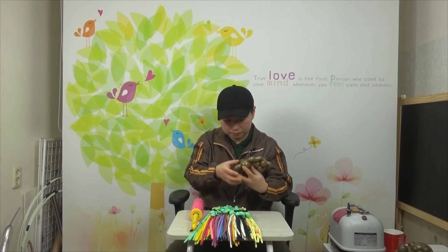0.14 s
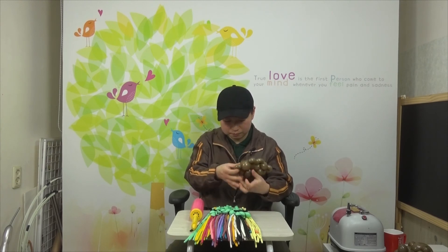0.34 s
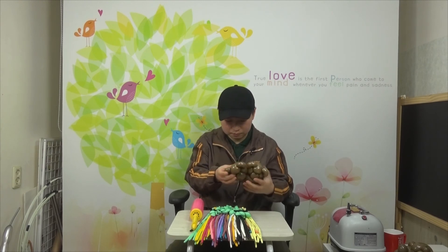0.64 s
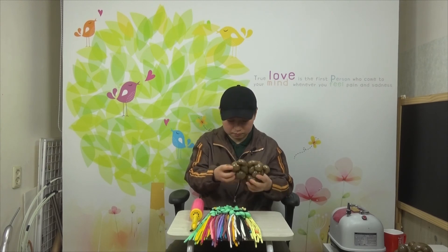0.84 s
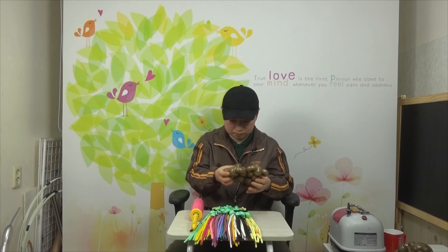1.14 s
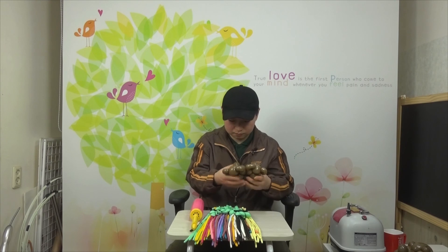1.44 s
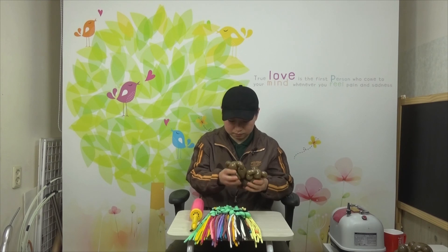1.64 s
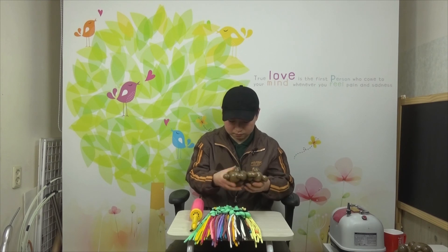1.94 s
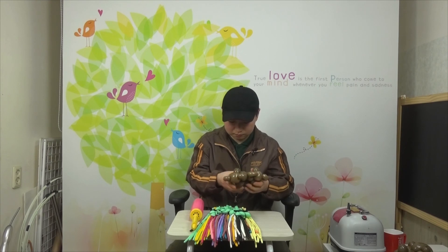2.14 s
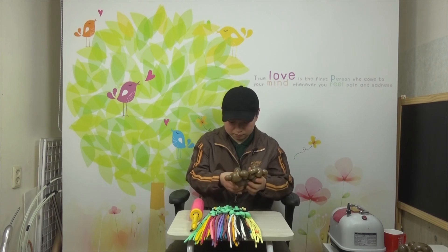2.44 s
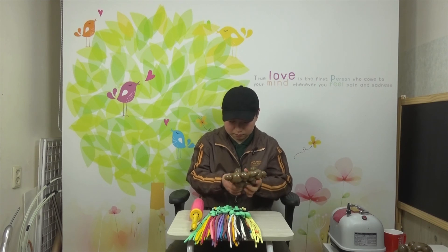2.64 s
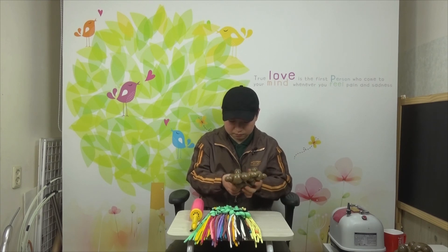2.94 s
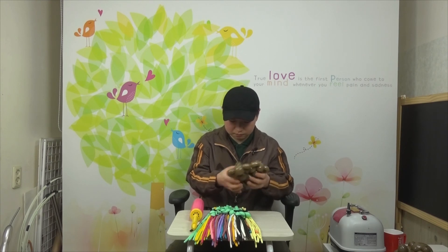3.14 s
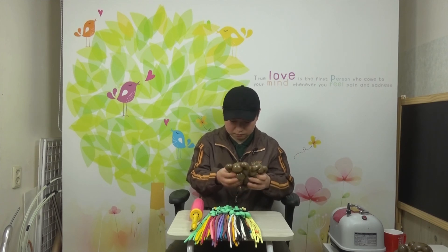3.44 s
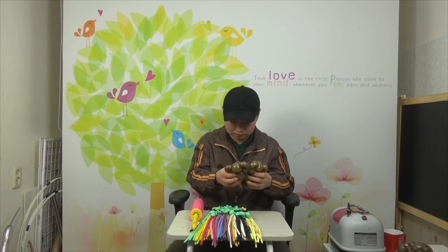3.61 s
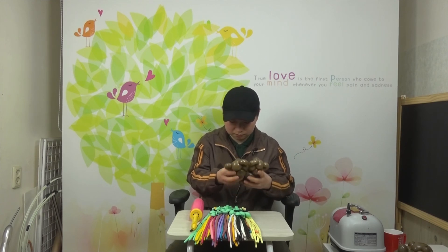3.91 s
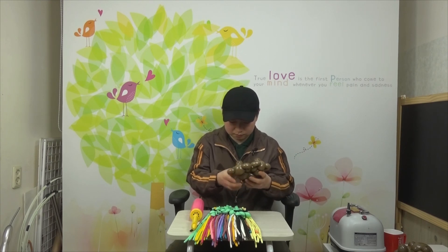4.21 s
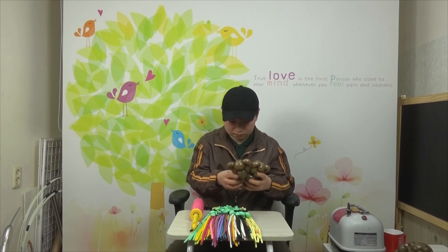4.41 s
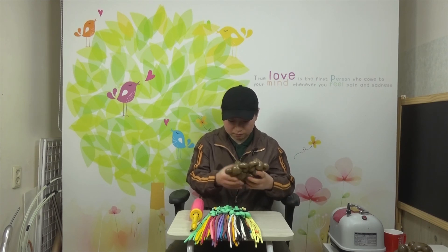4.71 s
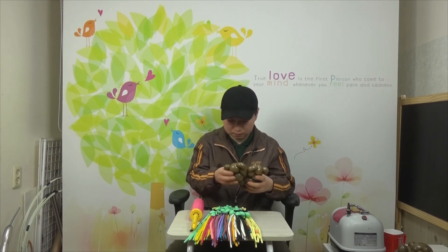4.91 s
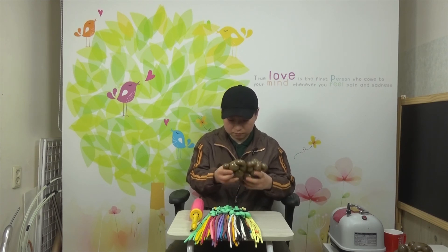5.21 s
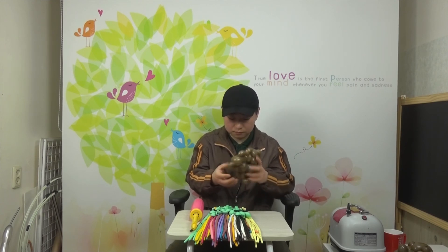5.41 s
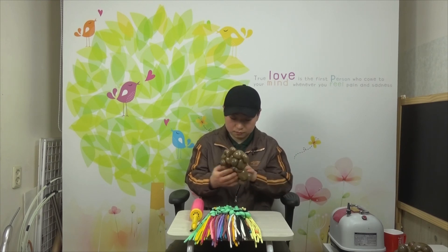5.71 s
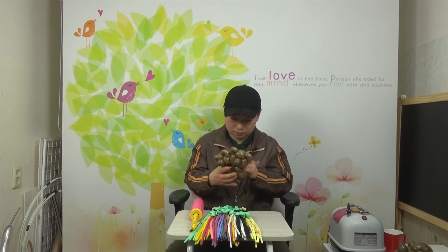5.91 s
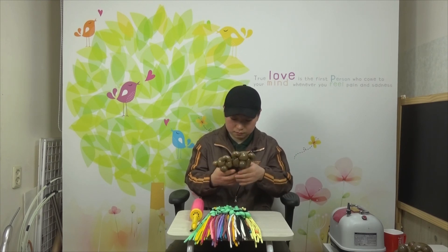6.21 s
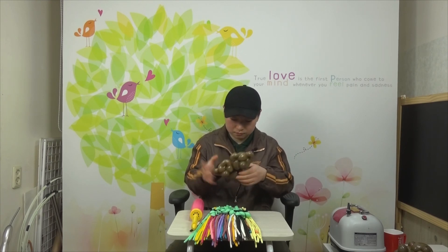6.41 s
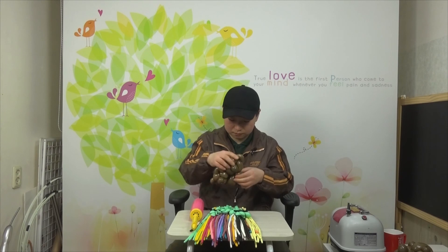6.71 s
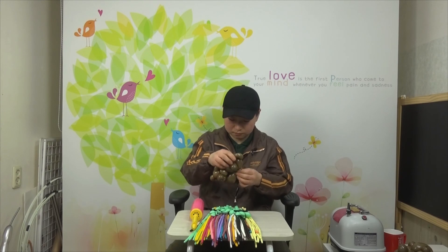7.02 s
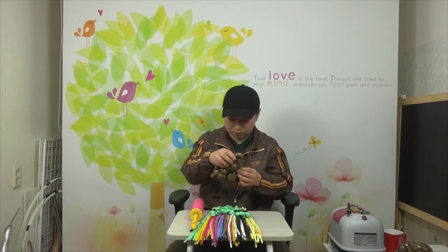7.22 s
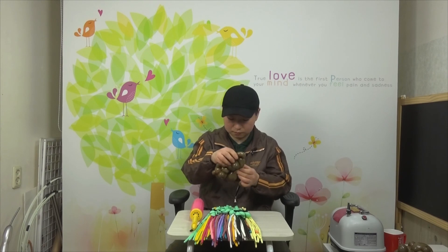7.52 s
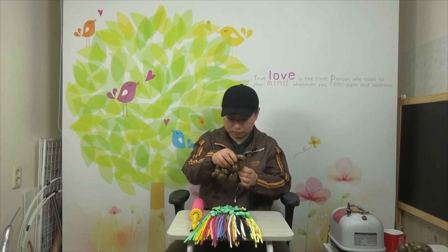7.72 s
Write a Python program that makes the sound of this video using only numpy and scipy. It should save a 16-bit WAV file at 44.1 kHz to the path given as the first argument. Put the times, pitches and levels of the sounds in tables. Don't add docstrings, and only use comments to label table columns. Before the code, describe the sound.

Close to the microphone, hands handle a figure of twisted balloons in a small quiet room. Faint sliding gives way to uneven rubbery rubs, dry snaps and hollow booms of the air-filled segments. A stuttering creak comes near the middle, then low groaning strokes, and finally a thick burst of snaps, peeling ticks and thumps. Soft sleeve rustle and a short dull reverberation lie underneath.

```python
import sys
import numpy as np
from scipy import signal
from scipy.fft import rfft, irfft, next_fast_len
from scipy.io import wavfile

SR = 44100
rng = np.random.default_rng(int(sys.argv[2]) if len(sys.argv) > 2 else 0)


def invert_db(level):
    return 10 ** (np.asarray(level, dtype=float) / 20)


def to_wav(sig):
    pcm = np.clip(np.atleast_2d(sig), -1, 1) * 32767
    pcm = np.round(pcm).astype(np.int16)
    wavfile.write(sys.argv[1], SR, pcm.T)


N = 346251

# [f/Hz, density level/dB]
AIR_SPECTRUM = [(25, -25), (110, -24), (480, -5), (1500, -10), (6000, -17), (16000, -30)]
AIR_DB = -58
SLEEVES_FROM_S, SLEEVES_DB = 0.31, 5.5
SLEEVE_RUMBLE_DB, SLEEVE_TOP_HZ = -51.5, 137

# [t/s, length/s, sliding level/dB, squeeze level/dB]
RESTS = [(0, 0.032, -51, 10.5), (0.22, 0.14, -58, 15), (0.69, 0.083, -48, 10), (1.236, 0.15, -42.5, 6.5),
         (1.438, 0.2, -43, 1), (1.722, 0.023, -43, 17.5), (2.317, 0.15, -39, -1), (2.96, 0.05, -38.5, 7.5),
         (3.184, 0.084, -38, 2), (3.56, 0.18, -46.5, 5.5), (3.943, 0.033, -42.5, 7),
         (4.338, 0.03, -56.5, 17), (4.555, 0.24, -42, -2), (4.787, 0.1, -57, 9.5), (5.13, 0.09, -44.5, 4),
         (5.397, 0.21, -46, -1), (5.6, 0.11, -52, 2), (6.152, 0.064, -41, -1.5), (6.509, 0.11, -45, 5.5),
         (6.657, 0.074, -49, 21), (6.914, 0.058, -37, -3), (7.333, .05, -36.5, -10),
         (7.461, 0.19, -41.5, 0)]
# [t/s, length/s, sliding level/dB, squeeze level/dB]
RUBS = [(0.477, 0.2, -36.5, 6), (0.862, .3, -30.5, -0.5), (0.961, 0.064, -21.5, -8.5),
        (1.57, 0.15, -26.5, -5), (1.782, 0.069, -38.5, 12), (1.866, 0.11, -26.5, -0.5),
        (2.472, 0.11, -29.5, -4), (2.594, 0.2, -35.5, 0.5), (2.816, 0.14, -29, -6), (3.03, 0.15, -29, -4),
        (3.292, 0.13, -34.5, 4), (3.417, 0.13, -27, -2.5), (3.684, 0.068, -29.5, -1.5),
        (3.978, 0.069, -28, -1.5), (4.425, 0.12, -27, -3), (4.681, 0.07, -31.5, 5),
        (4.912, 0.19, -22.5, -2.5), (5.238, 0.12, -23.5, 2.5), (5.761, 0.099, -35.5, 0),
        (5.885, 0.11, -34.5, 10.5), (6.026, 0.1, -33, -4), (6.328, 0.13, -31, 2), (6.45, 0.052, -41, 19.5),
        (6.742, 0.14, -27.5, 1.5), (6.964, 0.12, -25.5, -1), (7.112, 0.21, -35, 5),
        (7.385, 0.062, -24.5, 1), (7.61, 0.09, -24, -2.5), (7.714, 0.09, -33, -6), (7.818, .04, -28.5, 3)]
# [t/s, sliding level/dB, squeeze level/dB]
JERKS = [(0.368, -37.5, 17), (.4, -35, 13.5), (0.803, -32, 6.5), (1.181, -25, 3), (1.21, -42.5, 18),
         (2.143, -44, 9.5), (2.281, -35.5, 3.5), (2.404, -34, 5.5), (2.523, -20, -5), (3.1, -30, -3),
         (3.867, -40, 10.5), (3.9, -32, -8), (4.202, -33, -3.5), (4.238, -29, 10), (4.403, -40, 7),
         (4.602, -27, -8), (5.212, -31, 6), (5.695, -31, 3), (5.72, -32.5, 5.5), (6.267, -37, 8),
         (6.296, -39.5, 4), (7.102, -21, -7.5)]
JERK_S = 0.024
STILL_DB, LETTING_GO_DB_PER_S = -105, 386
# [start t/s, end t/s]
GLIDES = [(0, 0.057), (.52, 0.63), (1.575, 1.44), (1.872, 1.9), (2.33, 2.31), (2.48, 2.58), (3.105, 3.28),
          (4.429, 4.27), (4.91, 5.03), (5.8, 5.83), (5.91, 6.4), (6.02, 6.25)]
GLIDE_HZ, GLIDE_DB = 6100, -29
SLIPS_PER_S = 260
CREAK_SHARE, CREAK_DB = 0.36, -1.5
RUMBLE_BELOW_DRUM_DB = -18

# [f/Hz, density level/dB]
SKIN_SPECTRUM = [(710, -33), (1200, -4), (2360, -2), (3500, -7.5), (5200, 1.5), (6940, -2.5), (14500, -13),
                 (15500, -8.5)]
# [f/Hz, level/dB, t60/s]
DRUM_MODES = [(203, -7.5, 0.032), (300, -4.5, 0.019), (500, 0.17, 0.02), (694, -1, 0.014),
              (937, -1.5, 0.01)]
# [f/Hz, level/dB, t60/s]
JOINT_MODES = [(2230, 0.5, 0.013), (2950, 1.5, 0.0064), (4080, 4.5, 0.003), (7510, -6.5, 0.0087),
               (10800, -25, 0.0023)]
# [f/Hz, level/dB, t60/s]
CREAK_BODY = [(382, 2.0, 0.022), (850, 2.3, 0.02), (1160, -2.0, 0.012)]
CHIRP_BODY = [(570, -3.0, 0.01), (1160, 4.0, 0.0056), (1550, -2, 0.0098)]
GROAN_BODY = [(180, -2.5, 0.014), (470, -4.0, 0.035), (800, -2.0, 0.0098)]

ROOM_T60_S, ROOM_DB, WALL_CUT_HZ = 0.29, -23, 5500

# [t/s, peak level/dB]
KNOT_SNAPS = [(.204, -29), (.37, -22), (1.4438, -24), (1.8291, -26), (2.7174, -14), (3.0448, -25),
              (3.6898, -29), (3.919, -14), (5.179, -15.5), (5.4671, -21), (5.9802, -32), (6.379, -8.5),
              (6.4408, -6.5), (6.4884, -9.5), (7.041, -7.5), (7.2138, -28), (7.3002, -10.5), (4.363, -32),
              (7.3808, -14), (7.5516, -17)]
# [t/s, peak level/dB]
SLACK_SNAPS = [(1.8005, -14), (.2948, -29), (.7371, -20.5), (.8067, -16), (.998, 4), (1.151, -11),
               (1.3736, -13), (1.786, -6.5), (1.9354, -0.5), (2.8082, -6.5), (2.8296, -8), (2.857, -12),
               (3.0987, -9.5), (3.168, -5), (3.2031, -14.5), (3.2364, -1.5), (2.2194, -29), (4.405, -17),
               (3.6204, -18), (3.7445, -12.5), (3.8779, -10.5), (3.8902, -6.5), (4.2411, -9.5),
               (5.6988, -4.5), (5.727, -19), (5.7912, -9.5), (6.4131, -12), (6.8616, 2), (7.4165, 0),
               (7.8206, -5)]
# [t/s, peak level/dB]
FLANK_SNAPS = [(.3077, -26), (.322, -26), (.4706, -10.5), (1.0826, -13), (1.3259, -12), (1.5004, -22.5),
               (1.8138, -11), (1.87, -5), (2.158, -12), (2.5518, 1), (2.6327, -6), (2.6672, -6),
               (2.703, -15), (2.74, -15), (2.7738, -13), (2.89, -9.5), (2.9382, -2.5), (3.5944, -15.5),
               (3.9272, -7), (3.9794, -8), (4.016, -9.5), (4.2044, -25), (4.605, -15.5), (4.685, -19),
               (6.214, -26), (6.3247, -13), (6.662, -14.5), (6.914, -10.5), (7.58, -16), (7.6433, -5.5)]
# [t/s, peak level/dB]
TIGHT_SNAPS = [(.2591, -25), (.8706, -8.5), (1.6292, -12), (1.939, -4.5), (5.9914, -34), (6.5698, -28),
               (6.7543, -16), (7.0606, -8), (7.0816, -4), (7.1124, 0), (7.1414, -6.5), (7.199, -8.5),
               (7.266, -2.5), (7.312, -9)]
# [t/s, peak level/dB]
PEELS = [(.482, -9.5), (1.7246, -13), (2.0026, -12), (2.0228, -10), (2.9268, -16), (2.9672, -10),
         (3.782, -20), (4.2578, -7), (4.7457, -13), (5.4896, -25), (7.0225, -5), (7.106, 3.5), (7.705, -9),
         (7.798, -9), (7.8408, -5.5)]
KNOT_HZ, SLACK_HZ, FLANK_HZ, TIGHT_HZ, PEEL_HZ = 1890, 2650, 4350, 5970, 8640
PITCH_SCATTER = 0.072
# [t/s, peak level/dB, skin pitch f/Hz]
TICKS = [(0.286, -27, 2340), (0.3906, -23, 3990), (0.4045, -18, 2650), (0.4114, -15, 3320),
         (0.5126, -17.5, 2380), (0.5487, -15, 2430), (0.6025, -25, 2430), (0.653, -17, 3300),
         (0.7636, -24, 2430), (0.831, -23, 2400), (0.9295, -12, 2900), (0.9562, -13, 2900),
         (1.1034, -10.5, 2760), (1.128, -11, 4340), (1.3052, -18.5, 5550), (1.47, -21.5, 2360),
         (1.5554, -23, 7600), (1.5722, -18, 2800), (1.6138, -14, 5490), (1.674, -11.5, 2540),
         (1.7324, -17.5, 2510), (1.8337, -11.5, 2570), (1.942, -9, 2300), (1.9534, -14, 2510),
         (1.963, -22, 3100), (1.9714, -17, 2320), (1.9838, -20, 2650), (2.384, -24, 2520),
         (2.4505, -25, 4080), (2.4627, -27, 2340), (2.4755, -19, 4120), (2.5375, -10, 3930),
         (2.5735, -8, 4200), (2.6544, -13, 2670), (2.684, -19, 4270), (3.007, -29, 7700),
         (3.0613, -19, 2450), (3.4102, -9, 2500), (3.4507, -21, 2480), (3.4893, -17, 2700),
         (3.5242, -11, 2620), (4.212, -14, 4130), (4.2342, -17, 2640), (4.3415, -28, 2640)]
# [t/s, peak level/dB, skin pitch f/Hz]
LATER_TICKS = [(4.4263, -19, 2890), (4.4795, -9, 8300), (4.4941, -11.5, 2570), (4.509, -10, 2500),
               (4.5441, -12, 4030), (4.56, -19, 7700), (4.6224, -15, 1460), (4.6326, -16, 4020),
               (4.6723, -15, 1500), (4.6974, -22, 2310), (4.707, -23, 7160), (4.7278, -12, 1490),
               (4.9714, -21, 2850), (5.033, -13, 1690), (5.3365, -11, 2420), (5.3586, -19, 2330),
               (5.3894, -17, 2430), (5.5952, -24.5, 1720), (5.7134, -10, 1560), (5.737, -22, 2370),
               (5.895, -7.5, 1900), (5.9042, -9.5, 6100), (5.9519, -22, 2230), (5.9624, -17, 2470),
               (6.2645, -18, 2050), (6.2722, -20, 5290), (6.2866, -15, 2070), (6.3569, -10.5, 1550),
               (6.4126, -5, 1500), (6.429, -11, 1540), (6.449, -12, 1690), (6.5144, -18, 1490),
               (6.7237, -19, 1520), (6.784, -11.5, 2170), (6.9531, -21, 2400), (6.983, -21, 7360),
               (7.001, -12, 6940), (7.1225, -6.5, 5130), (7.222, -23, 2890), (7.2314, -30, 2970),
               (7.2455, -12.5, 5360), (7.3255, -14, 8200), (7.3622, -19, 1720), (7.434, -13, 8630),
               (7.445, -15, 1680), (7.462, -20, 1790), (7.4844, -22, 4130), (7.609, -17, 2380),
               (7.6832, -9.5, 3400), (7.7472, -21, 4260)]

# [t/s, peak level/dB, f/Hz, t60/s]
BOOMS = [(0.205, -10.5, 800, 0.02), (.37, 0.5, 954, 0.025), (.408, -10, 530, 0.02),
         (0.654, -9.5, 470, 0.058), (1.182, -11, 676, 0.24), (1.546, -15.5, 480, 0.012),
         (1.782, -21, 750, 0.046), (1.821, -2.5, 795, 0.019), (1.934, -4, 718, .081),
         (2.153, -18, 860, 0.032), (2.322, -12, 595, 0.016), (2.416, -14, 506, 0.063),
         (2.524, -12, 590, 0.029), (2.806, -14.5, 930, .022), (3.233, -10, 650, 0.021),
         (7.818, -13, 487, 0.028), (4.241, -10.5, 974, 0.021), (4.402, -12, 525, 0.037),
         (4.694, -7.5, 432, 0.021), (5.177, -15, 530, 0.019), (5.431, -9, 513, 0.025),
         (5.697, -10.5, 575, 0.035), (5.893, -6.5, 446, 0.041), (6.263, -13, 447, 0.008),
         (6.361, -7, 499, 0.061), (6.423, -7, 305.8, 0.068), (6.44, -0.5, 466, 0.028),
         (6.661, -12, 976.6, 0.024), (6.786, -8, 463, 0.023), (6.861, 4.5, 308, 0.016),
         (.205, -9, 1920, .018),
    (.205, -33, 3760, .03),
    (0.206, -26, 2720, .02),
    (0.371, -18, 1760, 0.033),
    (.37, -28, 3260, .025),
    (.519, -10, 104, .2),
    (1.829, -7, 805, 0.021),
    (5.388, -14, 445, 0.017),
    (6.452, -1.5, 470, 0.043),
    (4.75, -10, 470, 0.013),
]
# [t/s, peak level/dB, f/Hz]
THUMPS = [(0.381, -16.5, 102), (.415, -9, 130), (0.615, -9.5, 91), (.655, -11, 90), (.806, -16.5, 94),
          (1.181, -18.5, 146), (2.339, -19, 66.4), (3.9, -21, 46.3), (3.969, -14.5, 98), (4.412, -18, 83),
          (4.687, -17.5, 92), (5.129, -16, 157), (5.435, -19, 108), (5.596, -23.5, 82), (5.7, -14, 97.5),
          (5.886, -18.5, 102), (5.956, -5.5, 52), (5.99, -11, 60), (6.062, -21, 33.3), (6.276, -17, 82),
          (6.379, -9, 131), (6.445, -2, 91), (6.475, -8, 122), (6.734, -15, 30.3), (6.791, -14, 70),
          (6.861, -11, 122), (7.116, -22, 94.5),
          (0.995, -21, 94),
    (1.41, -26, 60),
    (1.468, -22, 173),
    (1.552, -24, 54),
    (2.179, -28, 79),
    (6.151, -22.5, 153),
    (7.458, -21, 67),
]
PARTNER_RATIO = 1.75

# [start t/s, end t/s, start f/Hz, end f/Hz, level/dB]
SINGING = [(0.525, 0.583, 5600, 5800, -41), (1.872, 1.928, 4200, 3500, -27),
           (1.872, 1.918, 7600, 6600, -30), (1.872, 1.92, 12600, 13400, -33), (2.5, 2.527, 8000, 6800, -45),
           (3.105, 3.165, 2600, 2500, -33), (3.105, 3.165, 4100, 4000, -34), (3.085, 3.16, 8000, 7800, -36),
           (4.434, 4.48, 4300, 4100, -32), (4.57, 4.607, 2900, 2900, -42), (4.707, 4.726, 8500, 8500, -30),
           (4.915, 5.001, 2950, 2700, -52), (4.922, 5.002, 1050, 1500, -37), (5.057, 5.13, 1814, 1800, -32),
           (5.071, 5.13, 3100, 3400, -37), (5.197, 5.265, 5100, 4400, -45), (5.303, 5.367, 5300, 5300, -35),
           (5.303, 5.379, 2500, 2400, -34), (5.805, 5.885, 6000, 6300, -39),
           (5.815, 5.89, 10600, 11000, -46), (5.81, 5.89, 13400, 12000, -46),
           (5.912, 5.94, 9500, 8600, -38), (6.032, 6.075, 6900, 7500, -41),
           (6.117, 6.153, 9500, 10500, -43)]
SINGING_WIDTH_SHARE, SINGING_EDGE_S = 0.11, 0.0092

# [start t/s, end t/s, start slip rate f/Hz, end slip rate f/Hz, level/dB]
CHIRPS = [
    (1.187, 1.203, 380, 316, -10),
    (2.147, 2.161, 127, 170, -13.5),
    (2.2815, 2.302, 200, 170, -15.5),
    (2.409, 2.436, 412, 378, -8),
]
# [start t/s, end t/s, start slip rate f/Hz, end slip rate f/Hz, level/dB]
GROANS = [
    (1.605, 1.659, 354, 280, -24.5),
    (1.664, 1.738, 248, 390, -24),
    (4.908, 4.967, 470, 480, -42),
    (4.971, 5.033, 285, 225, -25.5),
    (5.034, 5.131, 223, 146, -19),
    (5.206, 5.247, 235, 170, -35.5),
    (5.246, 5.272, 280, 320, -25),
    (5.273, 5.333, 243, 175, -21),
]
# [start t/s, end t/s, start slip rate f/Hz, end slip rate f/Hz, level/dB]
CREAKS = [
    (3.2948, 3.305, 140, 136, -9),
    (3.322, 3.345, 110, 97, -8),
    (3.3525, 3.368, 116, 112, -6),
    (3.3705, 3.419, 166, 127, -8),
]

CEILING, CUTOFF_HZ = 0.88, 16100


def rms_one(x):
    return x / np.sqrt(np.mean(x ** 2) + 1e-20)


def bandpass(x, low_hz, high_hz):
    return signal.sosfilt(signal.butter(2, [low_hz, high_hz], "band", fs=SR, output="sos"), x)


def level_at(spectrum, hz):
    table = np.array(spectrum)
    return np.interp(np.log(hz), np.log(table[:, 0]), table[:, 1])


def drift(rate):
    r = np.exp(-80 * np.pi * rate / SR)
    slow = signal.lfilter([1], [1, -2 * r, r * r], rng.standard_normal(N // 40 + 2002))[2000:]
    return np.interp(np.arange(N) / 40, np.arange(len(slow)), rms_one(slow))


def ring(clicks, hz, t60):
    r, w = invert_db(-60 / (t60 * SR)), 2 * np.pi * hz / SR
    return signal.lfilter([0, np.sin(w)], [1, -2 * r * np.cos(w), r * r], clicks + 1e-18)


def add(track, s, piece):
    i = round(s * SR)
    track[i:i + len(piece)] += piece[:N - i]


def hush():
    hz = np.arange(1, N // 2 + 2) * SR / N
    busy = np.where(np.arange(N) / SR > SLEEVES_FROM_S, SLEEVES_DB, 0)
    rumble = bandpass(rng.standard_normal(N), 15, SLEEVE_TOP_HZ)
    sleeves = (busy > 0) * invert_db(SLEEVE_RUMBLE_DB + 3.3 * drift(5.4)) * rms_one(rumble)
    air = irfft(rfft(rng.standard_normal(N)) * invert_db(level_at(AIR_SPECTRUM, hz)), N)
    return sleeves + invert_db(AIR_DB + busy) * rms_one(air)


def held(share):
    db = np.full(N, STILL_DB + 0.)
    fall = LETTING_GO_DB_PER_S * np.arange(N) / SR
    jerks = [(s, JERK_S, slide_db, squeeze_db) for s, slide_db, squeeze_db in JERKS]
    for s, length, slide_db, squeeze_db in RUBS + RESTS + jerks:
        grip = slice(round(s * SR), round((s + length) * SR))
        db[grip] = np.maximum(db[grip], slide_db + share * squeeze_db)
    return invert_db(np.maximum.accumulate(db + fall) - fall)


def coloured(grit, low_hz, high_hz, patchy_db):
    edges, out = np.geomspace(low_hz, high_hz, num=5), 0
    for k, (low, high) in enumerate(zip(edges, edges[1:])):
        band = bandpass(grit[k % 2], low, high)
        band_db = level_at(SKIN_SPECTRUM, np.sqrt(low * high)) + patchy_db * drift(9.6)
        out = out + invert_db(band_db) * band
    return rms_one(out)


def rubbing():
    turns = np.cumsum(SLIPS_PER_S * invert_db(3.0 * drift(4) + 2.5 * drift(60)) / SR)
    strength_db = 4.2 * np.minimum(rng.exponential(1, N), 2.5) + 2.4 * drift(26)
    slips = np.diff(np.floor(turns), prepend=0) * invert_db(strength_db)
    n = np.arange(N)
    gliding = sum((n > start * SR) & (n < end * SR) for start, end in GLIDES) > 0
    slips = np.where(gliding, np.minimum(slips, 2), slips)

    fade = np.exp(-1 / (.0011 * SR))
    puffs = rms_one(signal.lfilter([1], [1, -fade], slips)) + 0.24
    puffs = np.where(gliding, 1, puffs)
    grit = puffs * rng.standard_normal((2, N))
    slide = held(0)
    creak = invert_db(CREAK_DB) * held(CREAK_SHARE)
    skin = slide * coloured(grit, 3570, 22000, patchy_db=2.5)
    skin = skin + creak * coloured(grit, 1030, 3850, patchy_db=0.95)
    skin = skin + invert_db(GLIDE_DB) * gliding * slide * rms_one(ring(grit[0], GLIDE_HZ, 0.0031))

    dealt = rng.integers(0, len(JOINT_MODES), N)
    plucks = 0
    for k, (hz, db, t60) in enumerate(JOINT_MODES):
        plucks = plucks + invert_db(db) * ring(slips * (dealt == k), hz, t60)
    skin = skin + invert_db(-11.5) * creak * rms_one(plucks)

    taps = rms_one(slips) + 0.22 * rng.standard_normal(N)
    drums = 0
    for k, (hz, db, t60) in enumerate(DRUM_MODES):
        drums = drums + (-1) ** k * invert_db(db + 2.82 * drift(13.4)) * ring(taps, hz, t60)
    rumble = bandpass(rng.standard_normal(N), 18, 130)
    low = rms_one(drums) + invert_db(RUMBLE_BELOW_DRUM_DB + 8.4 * drift(9.8)) * rms_one(rumble)
    return invert_db(-0.5) * skin + invert_db(1.0) * held(0.95) * low


def room(x):
    size = next_fast_len(N + SR)
    turn = np.exp(-2j * np.pi * np.arange(size // 2 + 1) / size)
    dull = np.exp(-2 * np.pi * WALL_CUT_HZ / SR)
    wall, echoes = (1 - dull) / (1 - dull * turn), 0
    lags = (rng.uniform(.006, .03, 8) * SR).astype(int)
    for k, lag in enumerate(lags):
        loop = invert_db(-60 * lag / SR / ROOM_T60_S) * wall * np.exp(lag * np.log(turn))
        echoes = echoes + (-1) ** k * loop / (1 - loop)
    return irfft(rfft(x, size) * echoes, size)[:N]


def snaps(table, skin_hz):
    out, t = np.zeros(N), np.arange(700) / SR
    noise = rng.standard_normal((len(table), len(t)))
    chance = rng.standard_normal((len(table), len(DRUM_MODES)))
    for (s, db, *pitch), hiss, own in zip(table, noise, chance):
        hz = (pitch or [skin_hz])[0] * (1 + PITCH_SCATTER * hiss[-1])
        decay = np.exp(-t / 0.0016) + 0.078 * np.exp(-t / 0.008)
        puff = hiss * (1 - np.exp(-t / .0006)) * decay
        broad = signal.lfilter([.5, 0, -.5], [1, -.9, .2], puff)
        crack = rms_one(broad) + 1.44 * rms_one(ring(puff, hz, 7.2 / hz))
        drum = 0
        for (drum_hz, drum_db, t60), o in zip(DRUM_MODES, own):
            drum = drum + invert_db(drum_db + 6.2 * o) * np.sin(2 * np.pi * drum_hz * t) * invert_db(-60 * t / t60)
        add(out, s, invert_db(db) * (0.91 * crack / np.abs(crack).max() + invert_db(-21.5) * drum))
    return out


def knocks(table, rise_cycles, rough):
    out, t = np.zeros(N), np.arange(SR // 4) / SR
    partners = PARTNER_RATIO * (1 + .1 * rng.uniform(-1, 1, len(table)))
    for (s, db, hz, t60), partner in zip(table, partners):
        decay = invert_db(-60 * t / t60)
        shape = (1 - np.exp(-t * hz / rise_cycles)) * decay
        wave = np.sin(2 * np.pi * hz * t) + rough * decay * np.sin(2 * np.pi * hz * partner * t)
        add(out, s + 0.0013, invert_db(db) * shape / shape.max() * wave / (1 + rough / 2))
    return out


def singing():
    out = np.zeros(N)
    for start, end, first_hz, last_hz, db in SINGING:
        t = np.arange(round((end - start) * SR)) / SR
        keep = np.exp(-np.pi * SINGING_WIDTH_SHARE * (first_hz + last_hz) / SR)
        slow = signal.lfilter([1], [1, -2 * keep, keep ** 2], rng.standard_normal((2, SR // 4)))
        a, b = slow[:, 500:len(t) + 500]
        phase = 2 * np.pi * np.cumsum(np.linspace(first_hz, last_hz, len(t))) / SR
        edge = np.clip(np.minimum(t, t[-1] - t) / SINGING_EDGE_S, 0, 1)
        add(out, start, invert_db(db) * edge * rms_one(a * np.cos(phase) + b * np.sin(phase)))
    return out * invert_db(2.1 * drift(120))


def creaks(table, body, uneven, drum_db, settle_s, hum_db=-60):
    skin, drum, hum = np.zeros((3, N))
    for start, end, first, last, skin_db in table:
        length = round((end - start) * SR)
        pace = np.linspace(first, last, length) * (1 + uneven * drift(80)[:length])
        turns = np.cumsum(pace) / SR
        slips = np.diff(np.floor(turns), prepend=-1) * invert_db(rng.normal(0, 1.3, length))
        settling = np.exp(-(np.arange(length) / SR / settle_s) ** 4)
        swing = signal.windows.tukey(length, .4) * np.sin(2 * np.pi * turns)
        add(skin, start, invert_db(skin_db) * slips * settling)
        add(drum, start, invert_db(skin_db + drum_db) * slips)
        add(hum, start, invert_db(skin_db + hum_db) * swing)
    grit = signal.lfilter([1], [1, -.96], skin) * rng.standard_normal(N)
    crack = .5 * sum((-1) ** k * invert_db(db) * ring(skin, hz, t60) for k, (hz, db, t60) in enumerate(JOINT_MODES))
    boom = sum((-1) ** k * invert_db(db) * ring(drum, hz, t60) for k, (hz, db, t60) in enumerate(body))
    return hum + crack + 0.28 * grit - boom


def scene():
    rub, t = rubbing(), np.arange(N) / SR
    for start, end, *_ in CHIRPS + CREAKS + GROANS:
        rub = np.where((t > start) & (t < end), invert_db(-7) * rub, rub)

    patches = [(KNOT_SNAPS, KNOT_HZ), (SLACK_SNAPS, SLACK_HZ), (FLANK_SNAPS, FLANK_HZ), (TIGHT_SNAPS, TIGHT_HZ),
               (PEELS, PEEL_HZ), (TICKS, None), (LATER_TICKS, None)]
    crackle = sum(snaps(*patch) for patch in patches)
    booms = knocks(BOOMS, rise_cycles=0.28, rough=0.42)
    grips = [(s - .004, db, hz, 6.0 / hz) for s, db, hz in THUMPS]
    thumps = knocks(grips, rise_cycles=0.27, rough=0.55)
    chirp = creaks(CHIRPS, CHIRP_BODY, uneven=0.069, drum_db=-4.5, settle_s=0.029)
    groan = creaks(GROANS, GROAN_BODY, uneven=.09, drum_db=1.7, settle_s=0.9, hum_db=-1.0)
    creak = creaks(CREAKS, CREAK_BODY, uneven=.035, drum_db=-6, settle_s=0.03)

    figure = rub + crackle + booms + singing() + chirp + groan + creak
    return (figure + invert_db(ROOM_DB) * room(figure) + thumps + hush())[None]


def roll_off(x):
    return signal.sosfilt(signal.butter(12, 16810, fs=SR, output="sos"), x)


def record(dry):
    clipped = np.clip(dry, -CEILING, CEILING)
    mix = signal.sosfilt(signal.cheby2(16, 60, CUTOFF_HZ, fs=SR, output="sos"), clipped)
    mix = signal.sosfilt(signal.butter(1, 14, "high", fs=SR, output="sos"), mix)
    return roll_off(mix)


dry = scene()
out = record(dry)
to_wav(out)
```